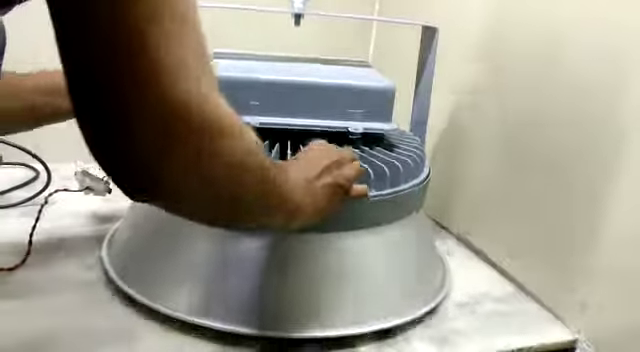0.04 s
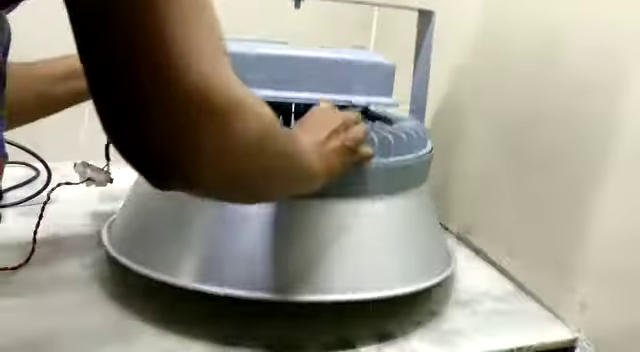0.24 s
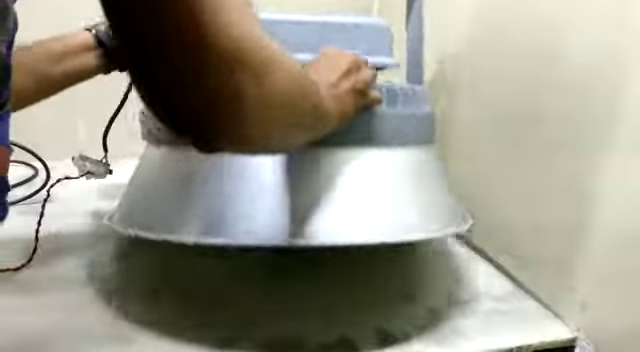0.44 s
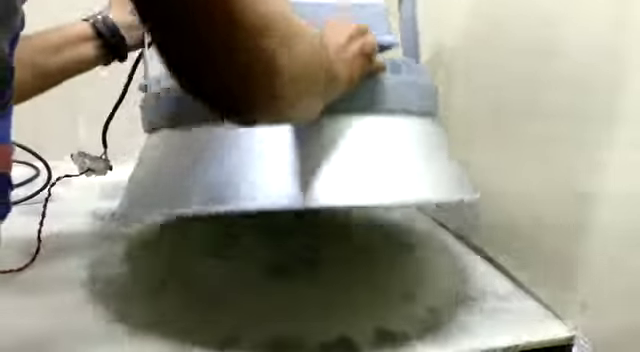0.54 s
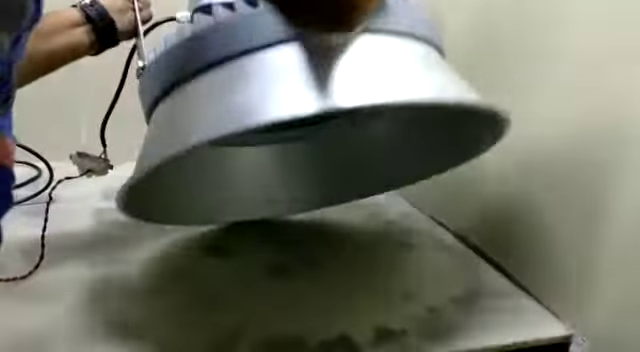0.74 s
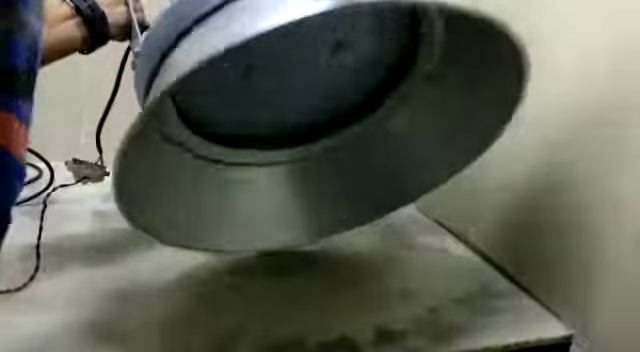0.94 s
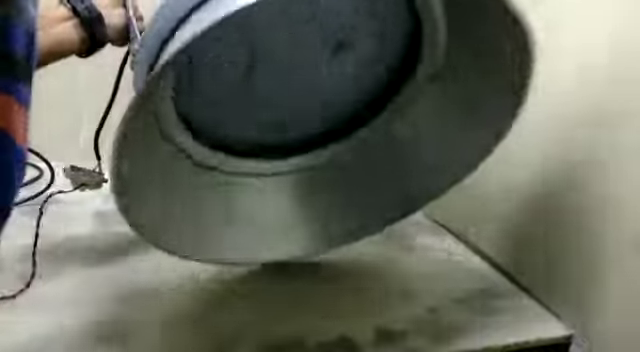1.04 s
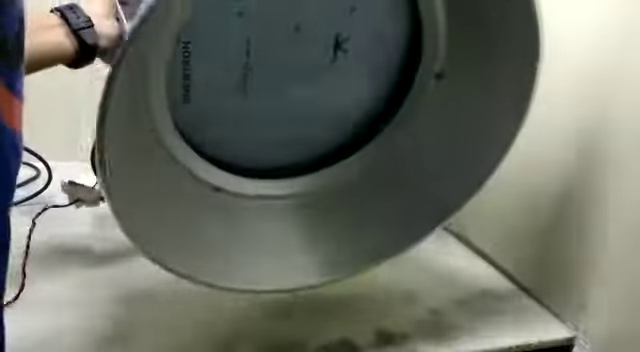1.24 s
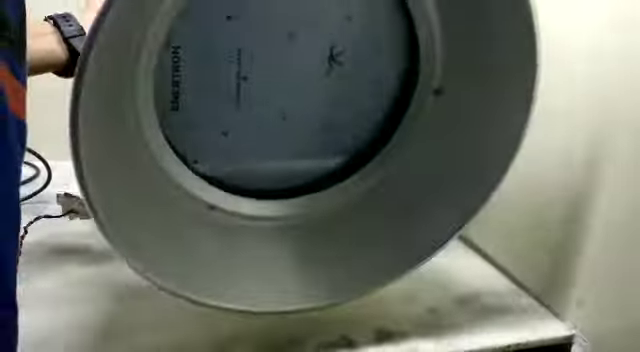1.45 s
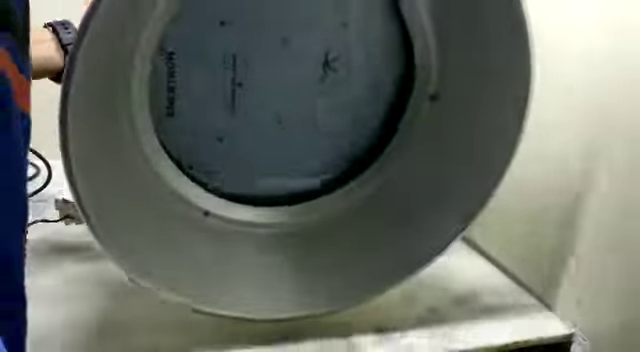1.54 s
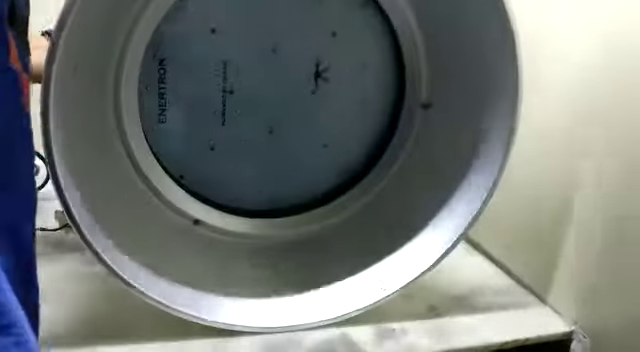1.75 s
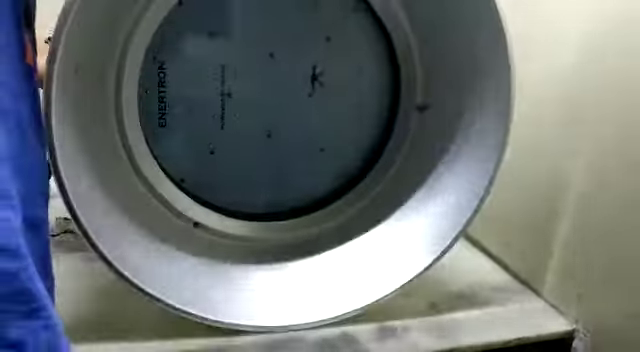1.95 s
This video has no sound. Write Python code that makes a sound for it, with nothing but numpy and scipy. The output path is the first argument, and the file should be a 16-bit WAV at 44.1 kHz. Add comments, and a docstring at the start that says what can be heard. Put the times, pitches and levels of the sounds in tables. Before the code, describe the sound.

A metal lamp shade scrapes across a tabletop, then knocks with ringing clanks in a small room

```python
"""Lamp shade on a tabletop

A spun-metal shade is dragged over a tabletop and lifted, knocks as it is tipped, and is set down on its rim.
Dense tiny impacts drive its clatter and resonances; knocks also leave deep decaying tones, and a squeak ends it.
A small hard-walled room answers the shade with tails of decaying noise. Moving air buffets the two microphones
as lumpy low noise, over a steady room hiss."""
import sys
import numpy as np
from scipy import signal
from scipy.fft import rfft, irfft, next_fast_len
from scipy.io import wavfile

SR = 44100
rng = np.random.default_rng(int(sys.argv[2]) if len(sys.argv) > 2 else 0)


def master_out(mix):
    """Clip the mix to full scale and print it as 16-bit PCM to the path in sys.argv[1]."""
    frames = np.transpose(np.atleast_2d(mix))
    ceiling = np.clip(frames, -1, 1)
    pcm = np.round(ceiling * 32767).astype(np.int16)
    wavfile.write(sys.argv[1], SR, pcm)


N = 88200

# Rim slides, one table each: (time [s], force [dB], then relative to force:
# low ring [dB], treble [dB], body [dB], singing mode [dB])
RIM_SLIDES = [
    [(0.0, -42.5, -29, -10.5, 1, 3), (0.13, -34, -18, -10, -9.5, -34), (0.19, -34, -1, -8, -13, 15.5),
     (0.22, -30, -27, -12, -2.5, 2), (0.24, -33, 2.5, -5.5, -6, 17.5), (0.296, -30, -5, -15, -15, 16.5),
     (0.366, -29.5, -8, -3, -0.5, 0), (0.48, -23.5, -17, -8.5, -12, 12.5),
     (0.528, -19, -23, -6.5, -49, -37), (0.6, -16, -32, -9, -24.5, -33), (0.64, -37, -44, -2, 10.5, -17)],
    [(1.64, -46, -19, -15, 15, -11), (1.666, -56, -27, -15, 8, -8), (1.68, -49.5, -10, -5, 13, -14),
     (1.716, -44.5, -23, -10, -14, -11), (1.738, -47, -17, -2, -3, -11), (1.78, -50, -7, -22, -3, -4),
     (1.82, -66, -13, -20, -6, -7)],
]
# Knocks, each a short rattle: (start [s], force [dB], rise time constant [s], hold [s], decay t60 [s],
# then relative to force: treble [dB], low ring [dB], body [dB])
KNOCK_RATTLES = [(0.919, -14.5, 0.0045, 0.023, 0.059, -3.5, -15, -7.5),
                 (1.02, -19.5, 0.0068, 0.018, 0.051, -1, -9, -4.5),
                 (1.195, -42, 0.0069, 0.011, .08, -6.5, -2.5, -7),
                 (1.628, -27, 0.0015, 0.011, 0.038, -3.5, -32, -7),
                 (1.676, -36, 0.0046, .005, 0.24, -2, -25, -2)]
TREBLE_FADE_DB_PER_S = 169   # the treble of a knock dies first
GRAINS_PER_S, GRAIN_SPREAD_DB = 5500, 1.5
CHATTER_DB, CHATTER_RATE_HZ = 2, 54

# Pitches of the shade's modes: (pitch [Hz])
MODE_HZ = [900, 1170, 1470, 1680, 1950, 2110, 2450, 2520, 2800, 2940, 3200, 3340, 3640, 4030, 4320]
# The same modes in order: (width [Hz], level dragged [dB], level tipped [dB], level set down [dB])
MODE_RINGS = [(48.6, -21.5, -44, -7.5), (37, -42, -10, -7), (23.7, -39, -14, -31), (23.2, -11, -13.5, -11),
              (51, -32, -21, -37), (69.5, -18.5, -19, -13), (33.5, -10.5, -4, -15), (71, -8, -1, -8),
              (25, -41, -22.5, -35), (44, -8.5, -6, -5), (40, -17.5, -35, -31), (59.7, -57, -19, -16),
              (38.3, -17, -21, -16), (40, -9.5, -19.5, -7), (70, -23, -26, -16)]
TIPPED_S, SET_DOWN_S = 0.8, 1.5   # the grip changes, and with it the balance of the modes
RING_WANDER_DB, RING_WANDER_RATE_HZ = 2.0, 8.9
# Broad clatter of the metal: (frequency [Hz], relative density [dB per Hz])
CLATTER_SPECTRUM = [(710, -133), (1200, -17), (2150, 1), (2330, -2), (2870, 3), (4660, -8.5), (5690, -21),
                    (7000, -37.5), (9100, -33.5), (15400, -120)]
# Treble fizz of the contact: (frequency [Hz], relative density [dB per Hz])
TREBLE_SPECTRUM = [(3530, -19), (6000, -6), (6980, -5), (7600, -11.5), (10800, -6), (11800, -8),
                   (15000, 2.5), (15600, -2)]
CLATTER_DB, TREBLE_DB = 3, -2
BODY_HZ, BODY_WIDTH_HZ = 1067, 640   # dull broad body under the clatter
SING_HZ, SING_WIDTH_HZ, SING_DB = 2800, 30, -7.5   # the mode that sings most under the sliding rim
LOW_RING_HZ, LOW_RING_WIDTH_HZ, LOW_RING_DB = 645, 29, 3

# Deepest modes, set ringing by each knock: (pitch [Hz])
BOOM_PITCHES = [380, 520, 640, 742]
# The same deep modes in order: (t60 [s], level relative to knock [dB])
BOOM_DECAYS = [(1.4, -22), (1.0, -29), (.35, -27), (1.0, -30)]
BOOM_RISE_S, BOOM_FLUTTER_DB, BOOM_FLUTTER_RATE_HZ = 0.03, 3.0, 8.6

# Pitches of the faint squeak at the end: (pitch [Hz])
SQUEAK_PITCHES = [2910, 3245]
# The same tones in order: (start [s], rise [s], time from start to fall [s], pitch waver [Hz], level [dB])
SQUEAK_TONES = [(1.87, .02, .08, 6, -57), (1.86, .06, .2, 5, -55)]
SQUEAK_PAN_DB = -15   # left minus right
SQUEAK_FLUTTER_DB, SQUEAK_FLUTTER_RATE_HZ, SQUEAK_WAVER_RATE_HZ = 4.0, 25, 28

# Where the shade is, as heard: (time [s], lag of left behind right [ms])
SHADE_PLACES = [(0, -.14), (0.201, -.14), (.35, -.14), (0.501, -.1), (.65, -.08), (.9, -.02), (1.05, 0.0),
                (1.3, .2), (1.651, .3), (2, .2)]
# Balance of the shade and its room at the microphones: (frequency [Hz], left minus right [dB])
SHADE_LEAN = [(60, -6), (110, -0.5), (200, 13), (380, -1), (700, -0.5), (1290, -2.5), (2380, -1.5),
              (4400, -9), (8120, -4), (15000, -7.5)]
# Room decay: (frequency [Hz], t60 [s])
ROOM_DECAY = [(400, 0.3), (1500, 0.56), (4000, 0.39), (9000, 0.38), (15000, 0.16)]
# Likeness of the room tail in the two microphones: (frequency [Hz], left-right likeness [-1 to 1])
TAIL_LIKENESS = [(300, 0.83), (640, 0.59), (1400, 0.033), (3000, 0.0071)]
DIRECT_DB, ROOM_DB = -10.5, -4

# Air on the microphones: (time [s], level before trim [dB], left minus right [dB])
AIR_GUSTS = [(0.0, -38.5, 4), (0.2, -44, -10), (0.26, -35, 10), (0.28, -41, -9), (0.34, -36, -20.5),
             (0.39, -31, -4), (0.46, -52, -9), (0.49, -27, 7), (0.61, -30, 3.5), (0.63, -27.5, -1.5),
             (0.74, -48, -16), (0.85, -44, -9), (0.9, -27, -11), (0.93, -32.5, 3), (0.95, -28, -9),
             (1.1, -35, 2), (1.13, -33.5, -16), (1.16, -42, -27), (1.21, -42, -3), (1.37, -51.5, -23),
             (1.47, -31, 4.5), (1.5, -38.5, -12), (1.53, -45, -6.0), (1.6, -46.5, -34), (1.64, -40.5, -4),
             (1.78, -34.5, -7), (1.84, -45.5, -6), (1.9, -46, -9), (1.93, -32.5, -18), (2.0, -36.5, -2)]
# Rumble of that air: (frequency [Hz], relative density [dB per Hz])
BUFFET_SPECTRUM = [(12, -50), (20, -20), (51, -1), (80, 9), (311, -12), (340, -27.5), (371, -17.5),
                   (400, -32.5), (520, -50.5), (880, -120)]
GUST_TRIM_DB, BUFFET_LUMPS_DB = 1, -2
LUMP_RATES_HZ = 6.7, 34

# Steady room hiss: (frequency [Hz], relative density [dB per Hz])
HISS_SPECTRUM = [(35, -22), (60, 8), (87, -7), (152, -7), (465, -18), (675, -20.5), (740, -12.5),
                 (979, -18), (1560, -17.5), (2600, -22.5), (3440, -19), (4760, -30.5), (7240, -49.5),
                 (15600, -40.5)]
HISS_DB = -46
# Balance of the hiss: (frequency [Hz], left minus right [dB])
HISS_BALANCE = [(60, 1), (110, 26), (200, 21), (380, -5), (700, -2.5), (1290, 0), (2380, -4.0),
                (4400, -8.0), (8120, -1), (15000, -1.0)]
# Likeness of the hiss in the two microphones: (frequency [Hz], left-right likeness [0 to 1])
HISS_ALIKE = [(60, 0.18), (150, 0.9), (300, 1), (600, 0.39), (1500, 0.067), (4000, 0.034)]
CUTOFF_HZ = 16250


def amp(db):
    """Decibels to amplitude."""
    return 10 ** (np.asarray(db) / 20)


def unit(x):
    """Scales x to an RMS of 1."""
    return x / np.sqrt(np.mean(x ** 2) + 1e-20)


def in_time(rows):
    """Draws straight lines through each column of a timed table."""
    s, *columns = np.transpose(rows)
    return [np.interp(np.arange(N) / SR, s, c) for c in columns]


def at_hz(points, hz):
    """Reads a frequency table along log frequency."""
    table_hz, values = np.transpose(points)
    return np.interp(np.log(hz), np.log(table_hz + 1), values)


def bins(size):
    """FFT bin frequencies in Hz, raised by 1 to keep logarithms finite."""
    return np.arange(size // 2 + 1) * SR / size + 1


def left_right(db):
    """Gains of the two channels for a left-minus-right difference in dB."""
    return amp(np.outer([0.5, -0.5], db))


def alike_pair(mid, side, alike):
    """Mixes two independent noises into left and right with a given likeness."""
    return np.sqrt(1 + alike) * mid + np.sqrt(1 - alike) * side * [[1], [-1]]


def colour(x, spectrum, lean=None):
    """Shapes x to a spectrum, steep outside its ends, with unit gain on white noise; lean tips the channels."""
    hz = bins(N)
    below = (spectrum[0][0] / hz) ** 6
    above = (hz / spectrum[-1][0] / 1.1) ** 12
    gain = unit(amp(at_hz(spectrum, hz)) / (1 + below + above))
    if lean:
        gain = gain * left_right(at_hz(lean, hz))
    return irfft(rfft(x) * gain, N)


def drift(rate_hz):
    """Slow chance with spread 1: noise through a two-pole low-pass, drawn every 40 samples."""
    step = 40
    r = np.exp(-2 * np.pi * rate_hz * step / SR)
    white = rng.standard_normal(N // step + 2002)
    slow = signal.lfilter([1], [1, -2 * r, r * r], white)[2000:]   # drop the filter's start-up
    return np.interp(np.arange(N) / step, np.arange(len(slow)), unit(slow))


def resonate(x, hz, width_hz):
    """One two-pole resonance, unit gain on white noise."""
    r = np.exp(-np.pi * width_hz / SR)
    gain = np.sqrt((1 - r * r) / 2)
    poles = [1, -2 * r * np.cos(2 * np.pi * hz / SR), r * r]
    return signal.lfilter([gain, 0, -gain], poles, x + 1e-18)


def shade():
    """The impacts sound as broad clatter, ring the modes, and fizz in the treble."""
    clatter, low, treble, body, sing = contact() * grains()
    grip = np.searchsorted([TIPPED_S, SET_DOWN_S], np.arange(N) / SR)
    rings = np.zeros(N)
    for k, (hz, (width_hz, *grip_db)) in enumerate(zip(MODE_HZ, MODE_RINGS)):
        level_db = np.array(grip_db)[grip] + RING_WANDER_DB * drift(RING_WANDER_RATE_HZ)
        rings += (-1) ** k * resonate(clatter * amp(level_db), hz, width_hz)   # polarity alternates
    out = rings + resonate(body, BODY_HZ, BODY_WIDTH_HZ)
    out += amp(CLATTER_DB) * colour(clatter, CLATTER_SPECTRUM)
    out += amp(TREBLE_DB) * colour(treble, TREBLE_SPECTRUM)
    out += amp(SING_DB) * resonate(sing, SING_HZ, SING_WIDTH_HZ)
    out += amp(LOW_RING_DB) * resonate(low, LOW_RING_HZ, LOW_RING_WIDTH_HZ)
    return out


def contact():
    """Force on the shade from slides and knocks: for clatter, low ring, treble, body and the singing mode."""
    t = np.arange(N) / SR
    force = np.zeros((5, N))
    for rows in RIM_SLIDES:
        level_db, *shares_db = in_time(rows)
        on = (t >= rows[0][0]) & (t <= rows[-1][0])
        force += on * amp(level_db + np.array([0 * t, *shares_db]))
    for s, db, rise, hold, t60, treble_db, low_db, body_db in KNOCK_RATTLES:
        age = np.maximum(t - s, 0)
        fall_db = 60 * np.maximum(age - hold, 0) / t60
        shape = (1 - np.exp(-age / rise)) * amp(db - fall_db)
        treble_fade_db = np.outer([0, 0, 1, 0], TREBLE_FADE_DB_PER_S * age)
        force[:4] += shape * amp([[0], [low_db], [treble_db], [body_db]] - treble_fade_db)
    return force


def grains():
    """Dense tiny impacts of uneven size, random in time and sign."""
    size_db = GRAIN_SPREAD_DB * np.minimum(rng.exponential(1, N), 4)
    size = amp(size_db) * rng.choice([-1, 1], N)
    hits = rng.random(N) < GRAINS_PER_S / SR
    return unit(size * hits) * amp(CHATTER_DB * drift(CHATTER_RATE_HZ))


def boom():
    """Each knock leaves the deepest modes humming as decaying, fluttering sines."""
    t = np.arange(N) / SR
    out = np.zeros(N)
    for s, knock_db, *_ in KNOCK_RATTLES:
        age = np.maximum(t - s, 0)
        rise = 1 - np.exp(-age / BOOM_RISE_S)
        for hz, (t60, share_db) in zip(BOOM_PITCHES, BOOM_DECAYS):
            flutter_db = BOOM_FLUTTER_DB * drift(BOOM_FLUTTER_RATE_HZ)
            level = amp(knock_db + share_db + flutter_db - 60 * age / t60)
            out += rise * level * np.sin(2 * np.pi * hz * age)
    return out


def squeak():
    """Thin wavering tones that swell and hold, falling away if time remains."""
    t = np.arange(N) / SR
    tones = np.zeros(N)
    for hz, (s, rise, length, waver_hz, db) in zip(SQUEAK_PITCHES, SQUEAK_TONES):
        level = amp(db + SQUEAK_FLUTTER_DB * drift(SQUEAK_FLUTTER_RATE_HZ))
        swell = np.clip((t - s) / rise, 0, 1)
        fall = np.clip((s + length - t) / rise + 1, 0, 1)
        pitch_hz = hz + waver_hz * drift(SQUEAK_WAVER_RATE_HZ)
        tones += level * swell * fall * np.sin(2 * np.pi * np.cumsum(pitch_hz) / SR)
    return tones * left_right(SQUEAK_PAN_DB)


def room_tails(places, size):
    """For each place, a stereo tail of noise dying band by band."""
    t = np.arange(size) / SR
    edges = 200 * 2 ** np.arange(0, 6.6, 0.5)   # half-octave bands
    white = rng.standard_normal((2, 2, places, 1, size))
    tails = 0
    for k, (low, high) in enumerate(zip(edges, edges[1:])):
        hz = np.sqrt(low * high)
        alike = np.clip(at_hz(TAIL_LIKENESS, hz), -1, 1)
        band = signal.butter(2, [low, high], "band", fs=SR, output="sos")
        mid, side = signal.sosfilt(band, white[k % 2])   # neighbouring bands use separate noise
        decay = amp(-60 * t / at_hz(ROOM_DECAY, hz))
        tails = tails + alike_pair(mid, side, alike) * decay / np.sqrt(2 * np.sum(decay ** 2))
    return tails


def room(x):
    """Each place has its own direct path and room tail; the sound fades from place to place."""
    size = SR // 2
    times, lags_ms = np.transpose(SHADE_PLACES)
    tails = room_tails(len(times), size)
    pad = next_fast_len(N + size)
    hz, out = bins(pad), 0
    for k, lag_ms in enumerate(lags_ms):
        share = np.interp(np.arange(N) / SR, times, np.arange(len(times)) == k)
        here = np.sqrt(share)   # equal-power crossfade
        delays_s = np.array([max(lag_ms, 0), max(-lag_ms, 0)]) / 1000
        direct = amp(DIRECT_DB) * np.exp(-2j * np.pi * np.outer(delays_s, hz))
        out = out + rfft(here * x, pad) * (direct + amp(ROOM_DB) * rfft(tails[k], pad))
    return irfft(out * left_right(at_hz(SHADE_LEAN, hz)), pad)[:, :N]


def buffeting():
    """Moving air makes lumpy low noise, its own in each microphone."""
    level_db, pan_db = in_time(AIR_GUSTS)
    lumps_db = BUFFET_LUMPS_DB * np.array([drift(rate) for rate in LUMP_RATES_HZ])   # left, right
    rumble = colour(rng.standard_normal((2, N)), BUFFET_SPECTRUM)
    return rumble * amp(level_db + GUST_TRIM_DB + lumps_db) * left_right(pan_db)


def hiss():
    """Steady coloured room noise, its likeness in the two microphones set by frequency."""
    alike = np.clip(at_hz(HISS_ALIKE, bins(N)), 0, 1)
    mid, side = rfft(rng.standard_normal((2, N)))
    pair = irfft(alike_pair(mid, side, alike), N)
    return amp(HISS_DB) * colour(pair, HISS_SPECTRUM, HISS_BALANCE)


def scene():
    """The shade in its room, with boom, squeak, moving air and hiss added directly."""
    return room(shade()) + boom() + squeak() + buffeting() + hiss()


def record(dry):
    """A steep low-pass cuts the top."""
    return signal.sosfilt(signal.cheby2(20, 55, CUTOFF_HZ, fs=SR, output="sos"), dry)


dry = scene()
out = record(dry)
master_out(out)
```